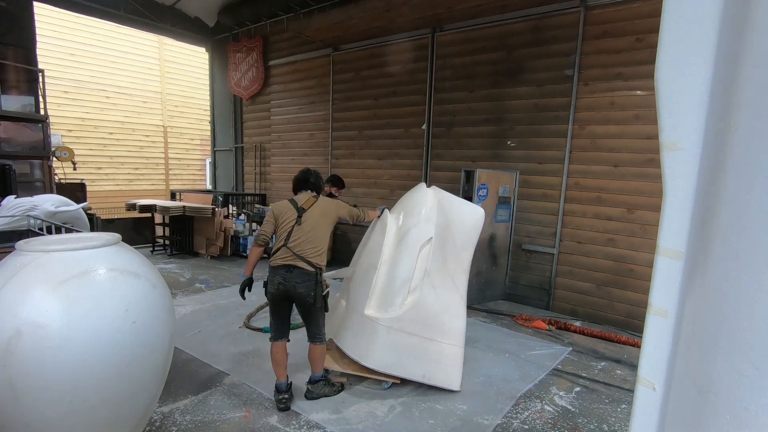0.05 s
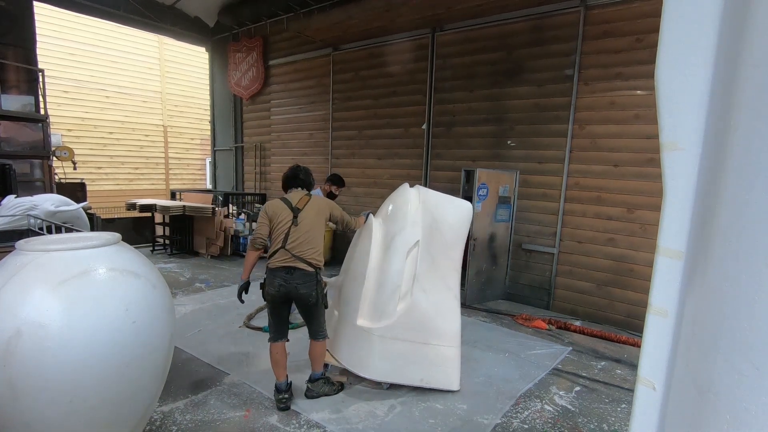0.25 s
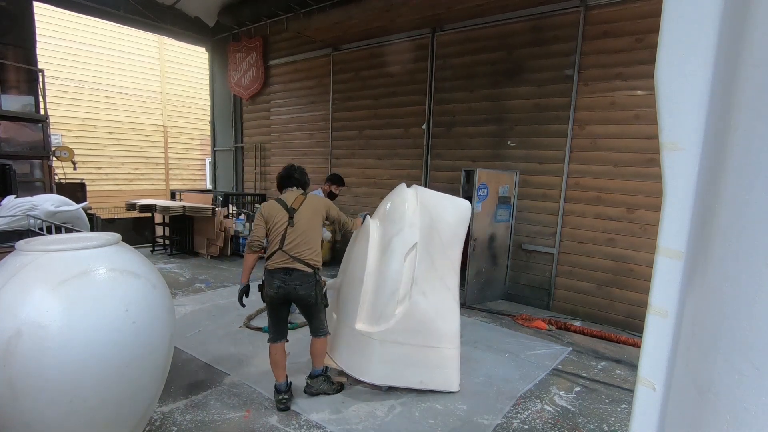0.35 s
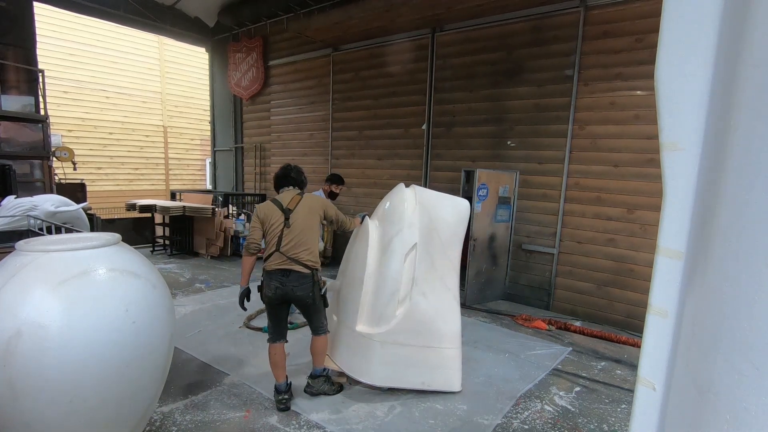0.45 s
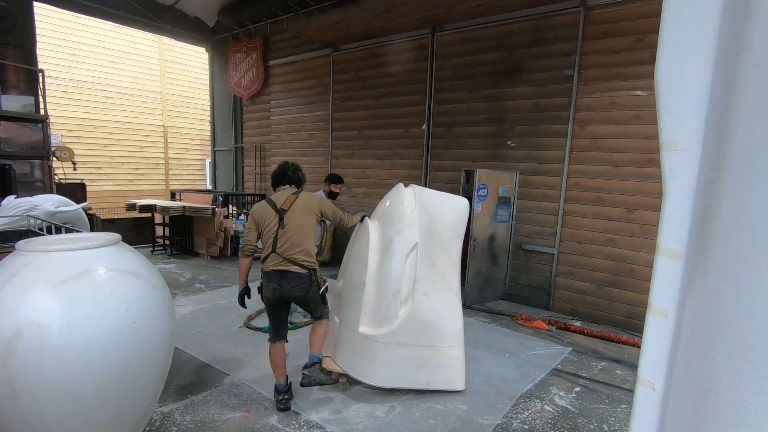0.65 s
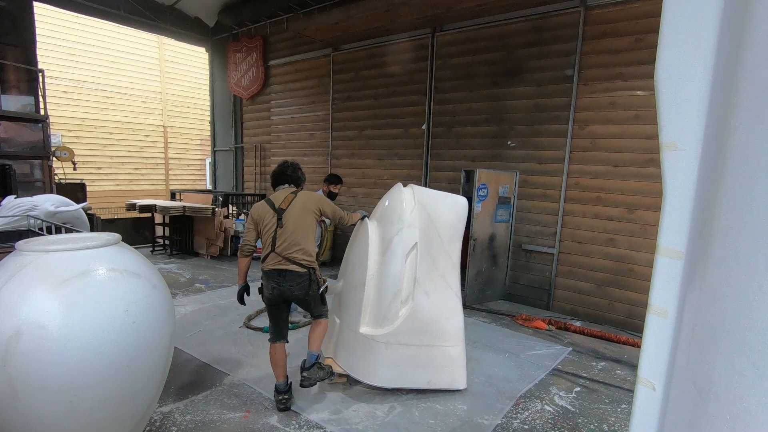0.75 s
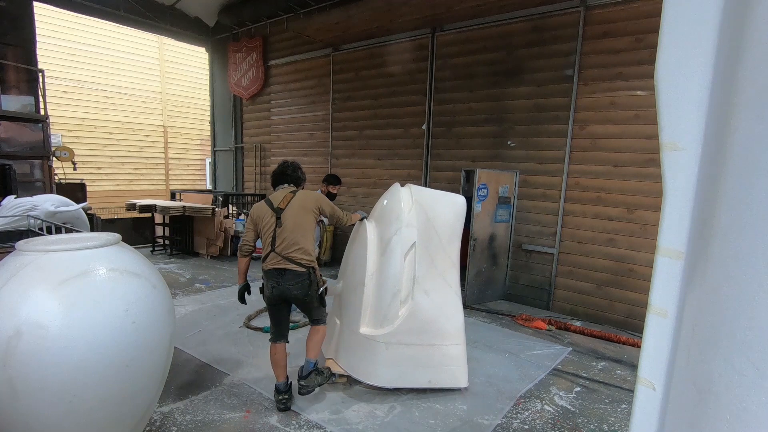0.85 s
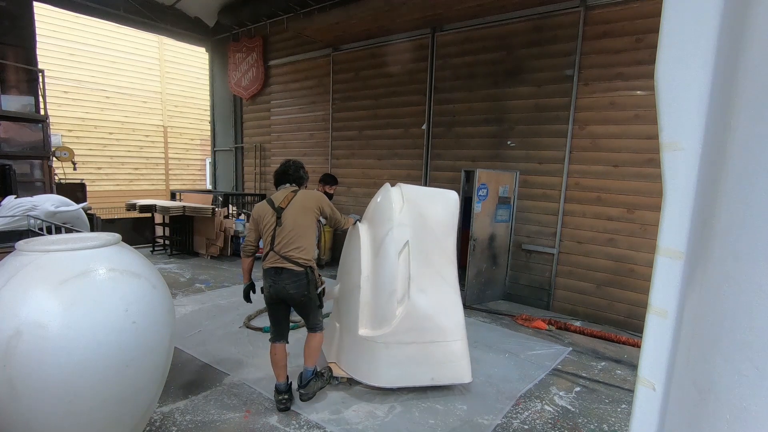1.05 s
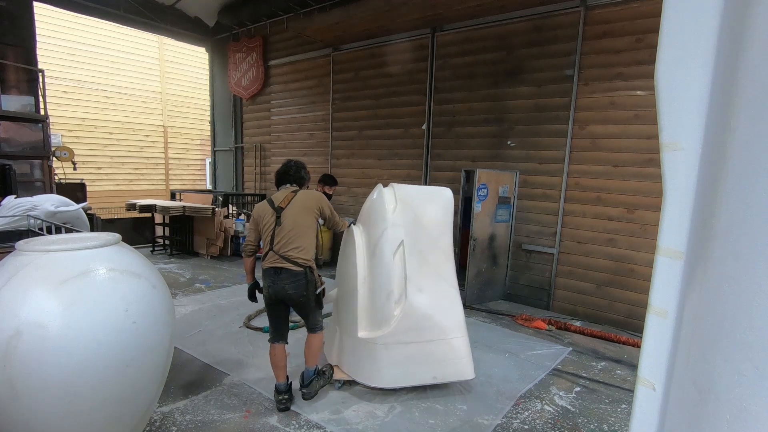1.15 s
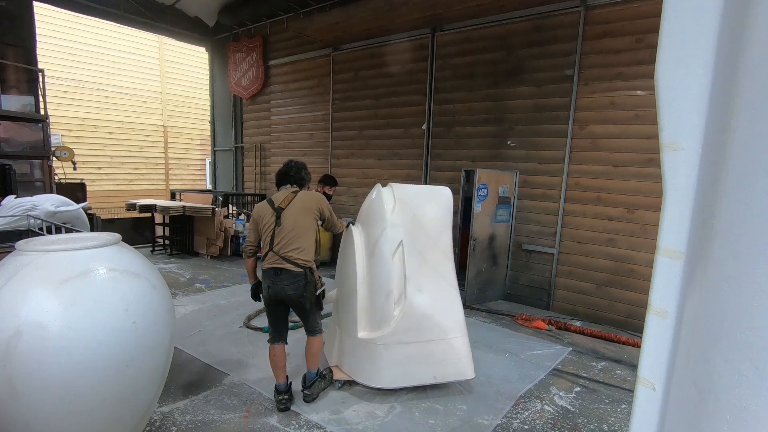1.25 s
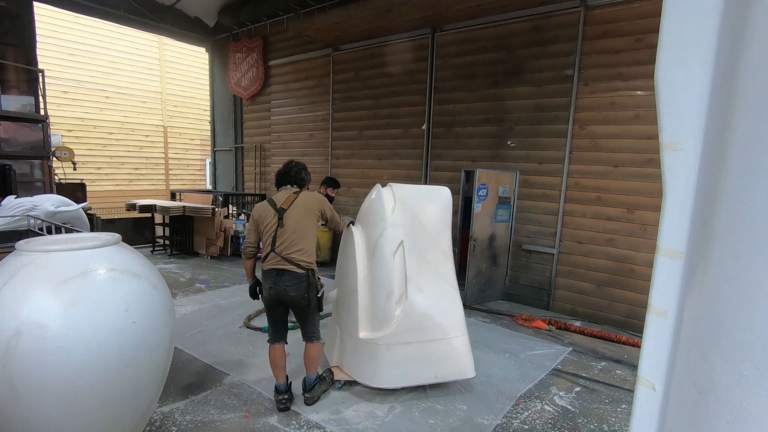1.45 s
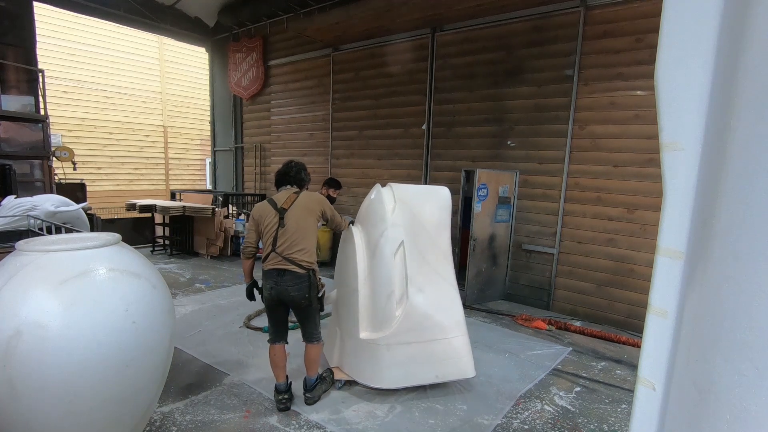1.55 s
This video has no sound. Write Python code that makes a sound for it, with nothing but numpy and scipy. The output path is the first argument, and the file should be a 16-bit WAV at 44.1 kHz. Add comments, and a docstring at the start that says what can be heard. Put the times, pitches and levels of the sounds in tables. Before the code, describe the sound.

A big hollow sculpture slides briefly off a board and lands with a loud crack and deep thud; a second later it rocks down more softly. Echoing workshop, faint hum and hiss, camera microphone at some distance.

```python
"""Workshop hall with a concrete floor: a big hollow sculpture slides off a wheeled board and is set down.
One edge lands with a crack and a deep thud; a second later it rocks down again, more softly.
Shell modes, short wall resonances, edge pulses and slow heaves, each placed in time, make the landings.
Decaying noise gives the hall; friction noise and a drone give the slide.
Behind lie steady hum tones, coloured rumble and hiss; the camera cuts the top of the spectrum."""
import sys
import numpy as np
from scipy import signal
from scipy.fft import rfft, irfft
from scipy.io import wavfile
from scipy.ndimage import uniform_filter1d

SR = 44100
rng = np.random.default_rng(int(sys.argv[2]) if len(sys.argv) > 2 else 0)


def dump_mix(stems):
    """Bounce the given channels to the path in sys.argv[1] as a 16-bit WAV at rate SR."""
    frames = np.atleast_2d(stems).T  # one column per channel
    limited = np.clip(frames, -1, 1)  # hard clip at full scale
    pcm = np.round(limited * 32767).astype(np.int16)
    wavfile.write(sys.argv[1], SR, pcm)


N = 70560  # samples: 1.6 s

# weight landing on the shell, also played by walls():
# t/s, level/dB, lowest f/Hz and highest f/Hz that the contact excites
LANDINGS = [(0.2244, 2, 146, 491), (0.2446, -0.5, 210, 434), (.274, -2.5, 50, 274), (0.2969, -1, 98, 134),
            (.440, -18, 69, 173), (.835, -42, 170, 179), (1.2351, -5.5, 280, 447), (1.259, -10.5, 36, 136),
            (1.311, -7.5, 88, 153), (1.385, -23, 79, 220), (1.418, -12.5, 74, 90), (1.463, -23.5, 67, 168)]
# ring of the hollow shell: f/Hz, level/dB, t60/s
SHELL_MODES = [(98, -5.5, 0.1), (142, -4.5, 0.37), (166.97, 2, 0.31), (204.6, -5, 0.31),
               (257.8, -9.5, 0.28), (304.6, -10, 0.31), (337, -8, 0.12), (416.7, -24, 0.48),
               (448, -21.5, 0.21), (497.2, -20, 0.35), (687, -20, 0.33), (899, -22, .38), (1083, -10, .3),
               (1216.4, -3, 0.17), (1388, -3.5, 0.11), (2110, 2, 0.033)]
SHELL_DB = -12.5


def shell(t):
    """Each landing rings the damped modes of the hollow shell within the range its contact excites."""
    ring = modes(SHELL_MODES, t)
    landings = 0
    for start, db, low_hz, high_hz in LANDINGS:
        landings = landings + undb(db) * delayed(contact(ring, low_hz, high_hz), start)
    return undb(SHELL_DB) * landings


# dense short resonances of the walls: f/Hz, level/dB per Hz
WALL_COLOUR = [(30, 2), (90, -25), (170, 9.5), (320, 6.5), (560, -3.5), (1100, 1), (2200, -27.5),
               (5000, -23)]
WALLS_DB, WALLS_DECAY_S = -13.5, 0.042  # decay to 1/e


def walls(t):
    """The same landings shake a crowd of short wall resonances, heard as fading coloured noise."""
    fade = np.exp(-t / WALLS_DECAY_S)
    landings = 0
    for start, db, low_hz, high_hz in LANDINGS:
        shudder = noise(WALL_COLOUR) * fade
        landings = landings + undb(db) * delayed(contact(shudder, low_hz, high_hz), start)
    return undb(WALLS_DB) * landings


# hard edges touching: t/s, level/dB, lowest f/Hz, highest f/Hz, crunch length/s
EDGE_CONTACTS = [(0.2238, 0, 470, 4820, 0.0029), (0.504, -40.5, 930, 2940, 0.0077),
                 (0.843, -38, 1580, 1900, 0.003), (1.232, -22.5, 403, 4540, 0.0025),
                 (1.2405, -16.5, 3200, 8950, 0.0055), (1.297, -22, 3000, 9000, 0.0067),
                 (1.336, -32, 352, 2370, 0.0034), (1.38, -25, 3730, 9000, 0.0049)]
# colour of an edge on concrete: f/Hz, level/dB per Hz
EDGE_COLOUR = [(200, -11.5), (600, -9), (950, -6.5), (1230, 12), (1600, 2), (2050, 1.5), (2450, -5),
               (3300, -10.5), (5000, -21.5), (7500, -33.5), (11000, -46)]
# colour that the edge radiates into the hall: f/Hz, level/dB per Hz
EDGE_HALL_COLOUR = [(300, 3), (800, -4.5), (1250, -0.5), (1800, -4.5), (2600, -9), (3500, -16),
                    (5000, -19.5), (7000, -40), (11000, -53.5)]
KNOCK_DB, CRUNCH_DB, EDGE_TO_HALL_DB = 6, -12.5, 10.5


def edges(t):
    """The rim knocks on concrete or board and crunches grit; gives the direct and hall-bound sound."""
    knock = undb(KNOCK_DB) * click(EDGE_COLOUR)
    spread = undb(EDGE_TO_HALL_DB) * click(EDGE_HALL_COLOUR)
    direct = to_hall = 0
    for start, db, low_hz, high_hz, length in EDGE_CONTACTS:
        # the crunch swells to a peak at half its length, then fades
        swell = 2 * t / length * np.exp(1 - 2 * t / length)
        crunch = undb(CRUNCH_DB) * noise(EDGE_COLOUR) * swell
        direct = direct + undb(db) * delayed(contact(knock + crunch, low_hz, high_hz), start)
        to_hall = to_hall + undb(db) * delayed(contact(spread, low_hz, high_hz), start)
    return direct, to_hall


# broad walls heaving after a landing: t/s, peak level/dB, length/s
WALL_HEAVES = [(0.246, -21, 0.051), (.37, -34, 0.11), (1.258, -26.5, 0.089), (1.391, -39.5, .11)]
HEAVE_HZ = 43


def heaves(t):
    """The broad walls make a few slow swings under a half-sine envelope."""
    swing = np.sin(2 * np.pi * HEAVE_HZ * t)
    total = 0
    for start, db, length in WALL_HEAVES:
        envelope = np.sin(np.pi * np.minimum(t / length, 1))
        total = total + undb(db) * delayed(swing * envelope, start)
    return total


# colour of the base sliding off the board: f/Hz, level/dB per Hz
SLIDE_COLOUR = [(40, 14), (100, 6), (250, 9), (500, 1), (900, -4), (2000, -0.5), (3000, -7), (4300, 3.5),
                (6000, -6), (8000, -22.5), (11000, -37), (12500, -19.5), (15500, -21)]
SLIDE_DB, SLIDE_FADE_S, SLIDE_GRAIN_DB = -41, 0.12, 1  # fade to 1/e, rms grain
DRONE_HZ, DRONE_WAVER_HZ, DRONE_DB, DRONE_END_S = 117.6, 13, -41, .3  # rms waver


def slide(t):
    """The base scrapes off the board as fading noise; friction drives a wavering drone in the shell."""
    grain = unit(uniform_filter1d(rng.standard_normal(N), size=200))
    scrape = noise(SLIDE_COLOUR) * undb(SLIDE_DB + SLIDE_GRAIN_DB * grain) * np.exp(-t / SLIDE_FADE_S)
    waver = unit(uniform_filter1d(rng.standard_normal(N), size=900))
    phase = 2 * np.pi * np.cumsum(DRONE_HZ + DRONE_WAVER_HZ * waver) / SR
    drone = unit(np.sin(phase))
    swell = np.sqrt(np.abs(np.sin(np.pi * np.minimum(t / DRONE_END_S, 1))))
    return scrape + undb(DRONE_DB) * drone * swell


# decay of the hall: f/Hz, t60/s
HALL_DECAY = [(60, 0.85), (200, 0.21), (600, 0.76), (1500, 0.31), (4000, .48), (10000, 0.49)]
HALL_DELAY_S, HALL_BUILD_S = 0.002048, .014


def hall(x, t):
    """Reflections build up, then die away, each octave band at its own rate."""
    tail, f = 0, freqs()
    white = rfft(rng.standard_normal(N))
    for hz in 2. ** np.arange(5, 15):  # 32 Hz to 16 kHz
        band_gain = np.maximum(1 - np.abs(np.log2(f / hz)), 0)
        band = irfft(white * band_gain, N)
        tail = tail + band * undb(-60 * t / along(HALL_DECAY, hz))
    tail = delayed(tail * (1 - np.exp(-t / HALL_BUILD_S)), HALL_DELAY_S)
    return signal.fftconvolve(x, unit(tail) / np.sqrt(N))[:N]  # response of unit energy


# steady machines: f/Hz, rms level/dB
MACHINE_HUM = [(59.2, -57.5), (118.4, -53.5), (349.9, -62), (400, -61.5), (452.2, -55)]
# colour of the low room noise: f/Hz, level/dB per Hz
RUMBLE_COLOUR = [(20, -6), (45, -2.5), (85, -15), (140, 0), (220, -8), (330, -6.5), (500, -9), (660, -18.5),
                 (1200, -27.5), (2600, -37.5), (6000, -44.5)]
RUMBLE_DB = -47
# colour of the hiss: f/Hz, level/dB per Hz
HISS_COLOUR = [(1000, -5), (2800, -7), (4000, 4.5), (5500, 1), (8000, -3.5), (9800, -15), (11200, -27),
               (12300, -3.5), (15500, -20)]
# course of the hiss: t/s, rms level/dB
HISS_COURSE = [(0, -50.5), (.25, -57), (.55, -62), (.75, -61.5), (1.1, -56), (1.6, -57.5)]


def workshop(t):
    """Steady machine tones, low room noise and a hiss that sinks and partly returns."""
    hum = 0
    for hz, db in MACHINE_HUM:
        tone = np.sin(2 * np.pi * (hz * t + rng.random()))
        hum = hum + np.sqrt(2) * undb(db) * tone  # a unit sine has rms 1/sqrt(2)
    hiss = noise(HISS_COLOUR) * undb(np.interp(t, *np.array(HISS_COURSE).T))
    return hum + undb(RUMBLE_DB) * noise(RUMBLE_COLOUR) + hiss


def undb(db):
    """Decibels to gain."""
    return 10 ** (np.asarray(db) / 20)


def unit(x):
    """Scale to rms 1."""
    return x / np.sqrt(np.mean(x ** 2))


def freqs():
    """Frequency of each spectrum bin, at least 1 Hz."""
    return np.maximum(np.arange(N // 2 + 1) * SR / N, 1)


def along(points, hz):
    """Read (f/Hz, value) points on a log-frequency axis."""
    f, v = np.array(points, float).T
    return np.interp(np.log(hz), np.log(f), v)


def noise(points):
    """Unit-rms noise with the colour of (f/Hz, level/dB) points."""
    white = rfft(rng.standard_normal(N))
    return unit(irfft(white * undb(along(points, freqs())), N))


def modes(table, t):
    """Decaying modes, all struck at once."""
    return sum(undb(db - 60 * t / t60) * np.sin(2 * np.pi * hz * t) for hz, db, t60 in table)


def click(points):
    """A causal pulse of unit energy with the colour of (f/Hz, level/dB) points."""
    cepstrum = irfft(np.log(undb(along(points, freqs()))), N)
    cepstrum[N // 2:] = 0  # keeping the causal half gives minimum phase
    return unit(irfft(np.exp(2 * rfft(cepstrum)), N)) / np.sqrt(N)


def soften(x, hz):
    """Two-pole low-pass: a softer contact."""
    return signal.sosfilt(signal.butter(2, min(hz, .45 * SR), fs=SR, output="sos"), x)


def contact(x, low_hz, high_hz):
    """A contact excites only a range of frequencies."""
    high_pass = signal.butter(3, low_hz, "high", fs=SR, output="sos")
    return signal.sosfilt(high_pass, soften(x, high_hz))


def delayed(x, start):
    """Place a sound at its start time in seconds."""
    return np.concatenate([np.zeros(max(int(start * SR), 0)), x])[:N]


SHELL_TO_HALL_DB, WALLS_TO_HALL_DB = -11.5, -4


def scene():
    """The sculpture, its echo in the hall and the background."""
    t = np.arange(N) / SR
    ring, body = shell(t), walls(t)
    crack, crack_to_hall = edges(t)
    to_hall = undb(SHELL_TO_HALL_DB) * ring + undb(WALLS_TO_HALL_DB) * body + crack_to_hall
    echo = hall(to_hall, t)
    return (ring + body + crack + heaves(t) + slide(t) + echo + workshop(t))[None]


TOP_HZ = 15700


def record(dry):
    """The camera cuts the top with a steep low-pass."""
    return signal.sosfilt(signal.ellip(10, .2, 90, TOP_HZ, fs=SR, output="sos"), dry)


dry = scene()
out = record(dry)
dump_mix(out)
```